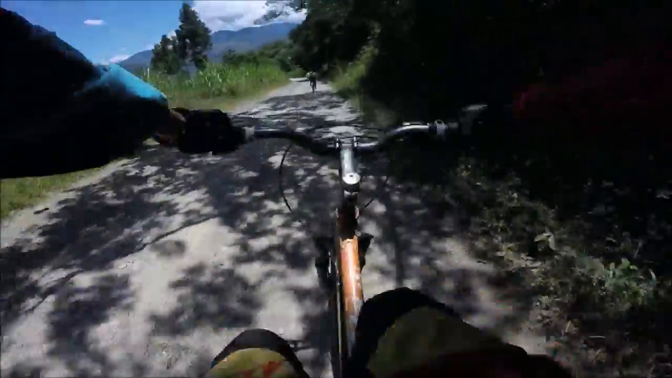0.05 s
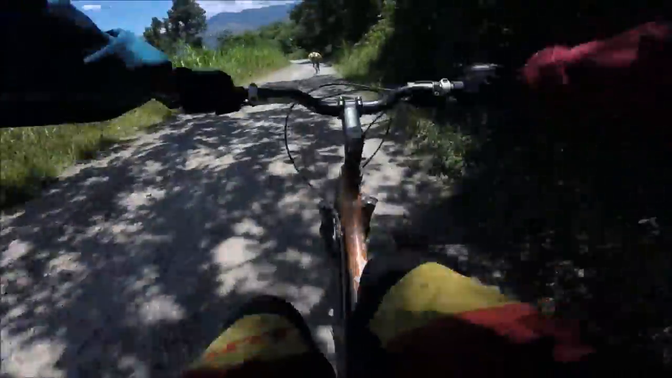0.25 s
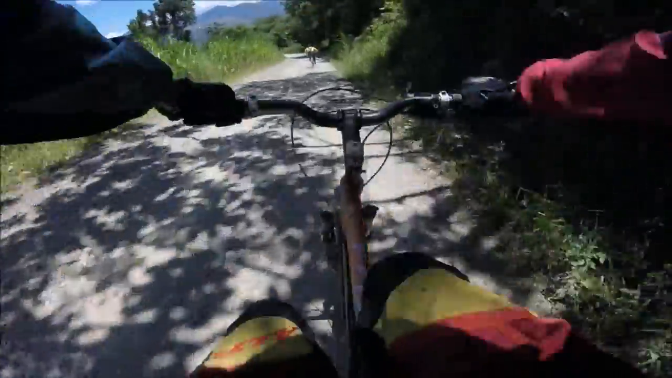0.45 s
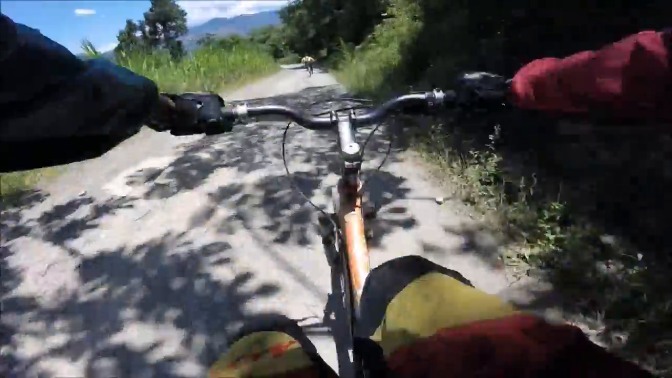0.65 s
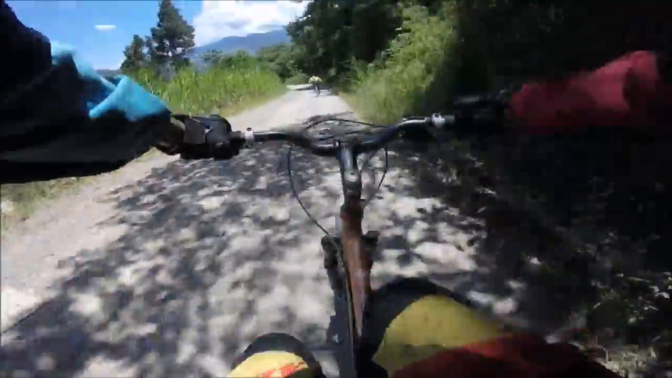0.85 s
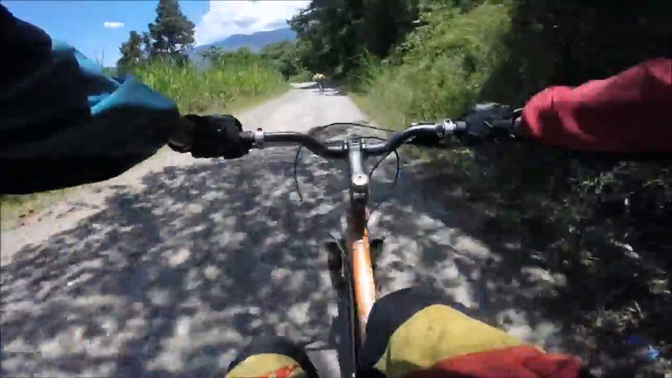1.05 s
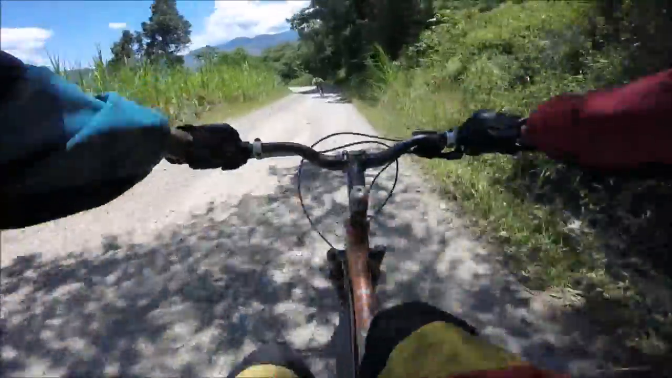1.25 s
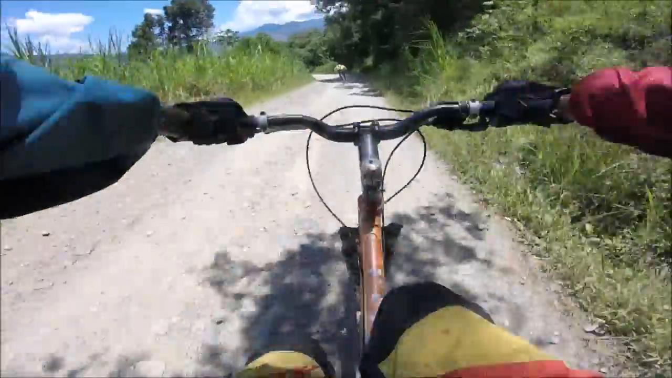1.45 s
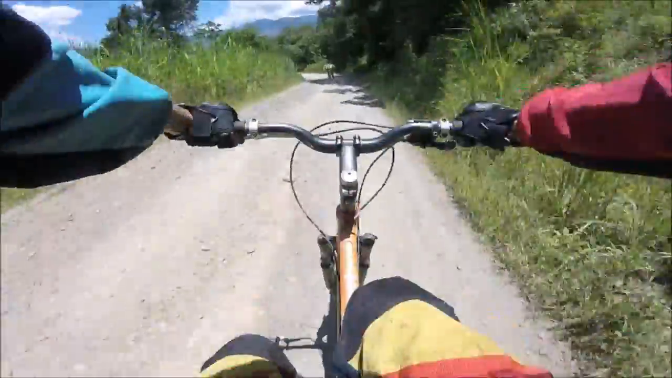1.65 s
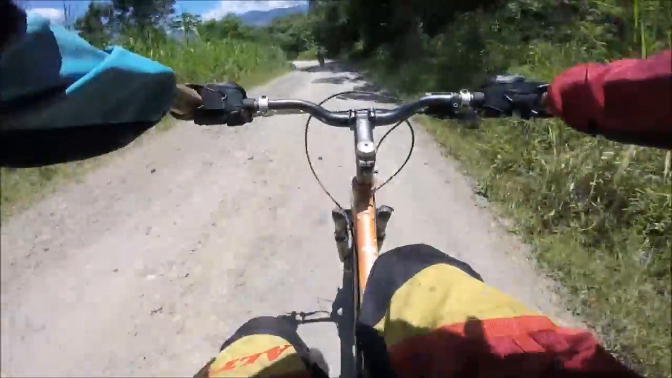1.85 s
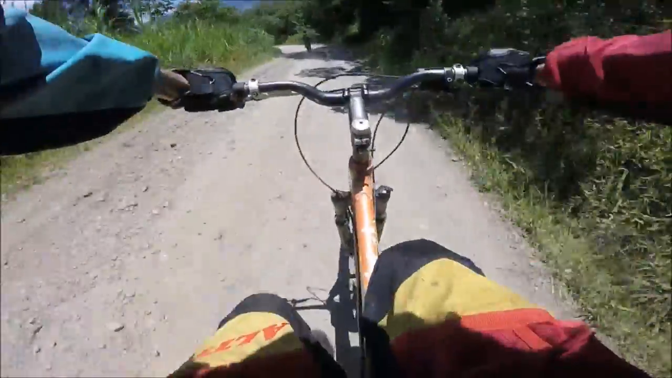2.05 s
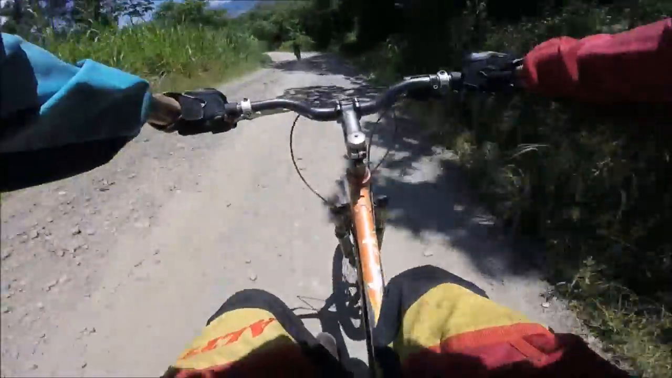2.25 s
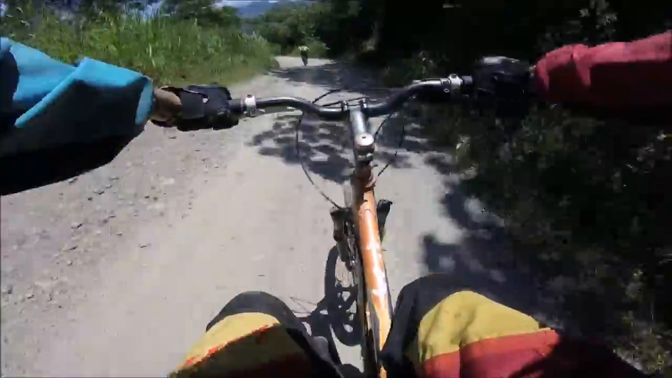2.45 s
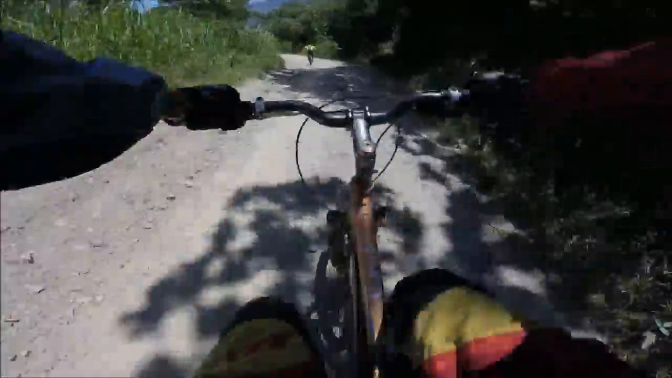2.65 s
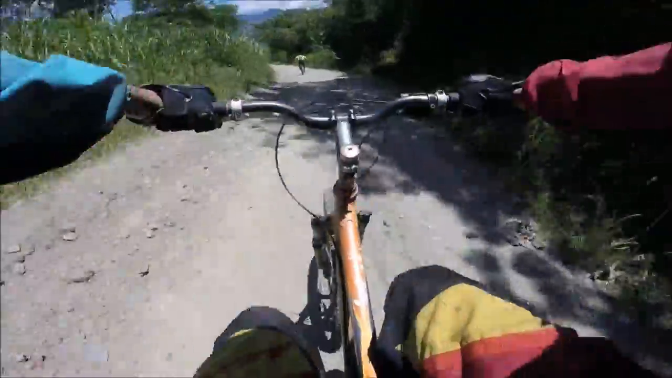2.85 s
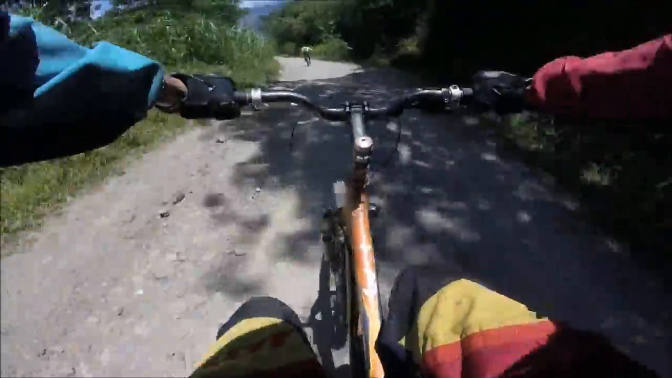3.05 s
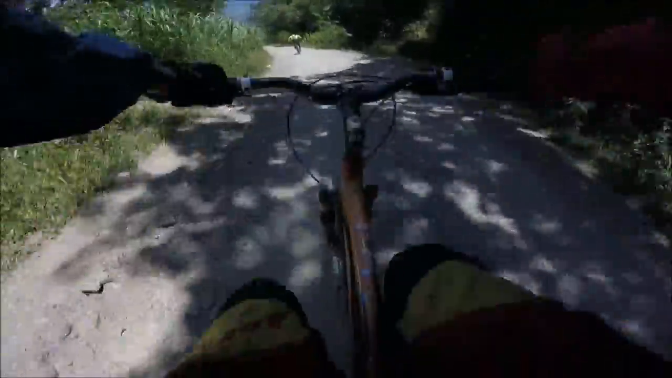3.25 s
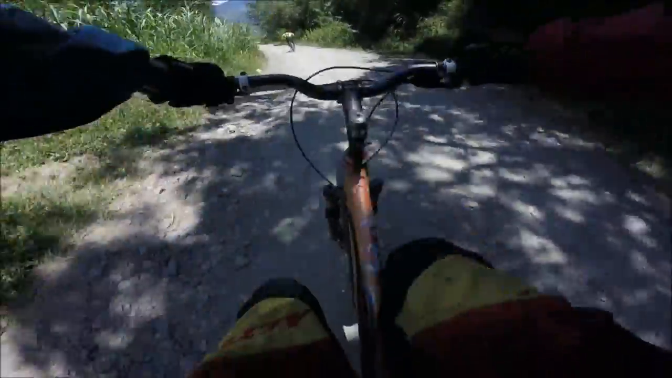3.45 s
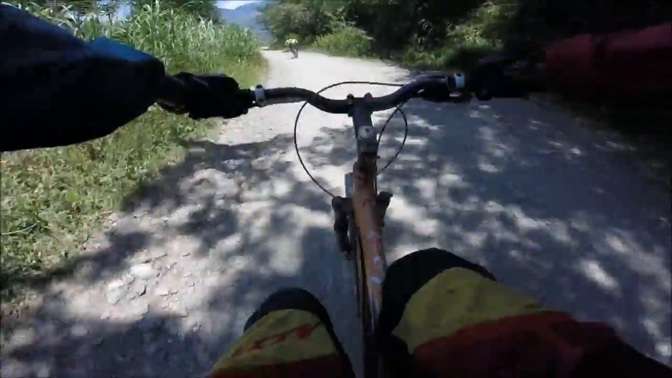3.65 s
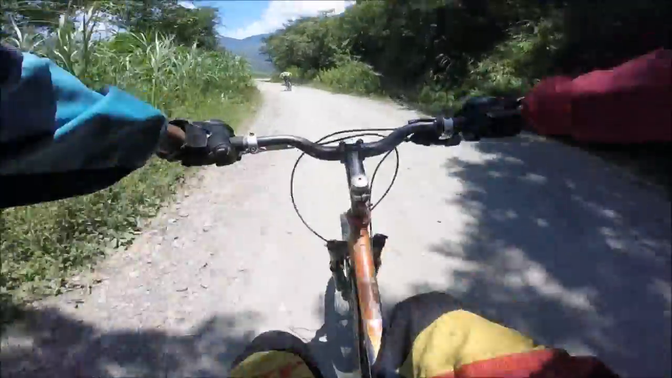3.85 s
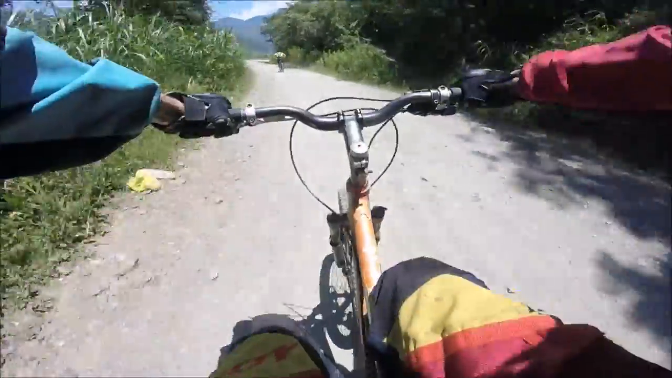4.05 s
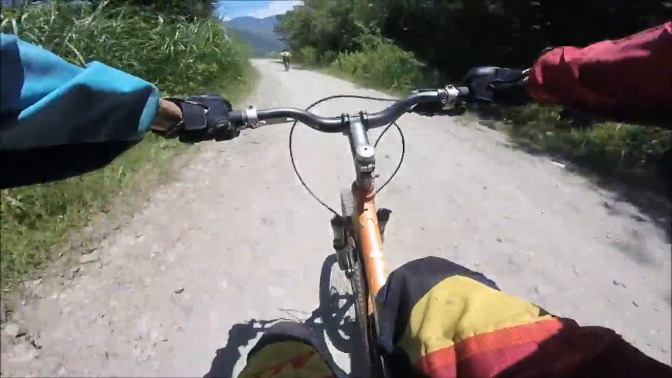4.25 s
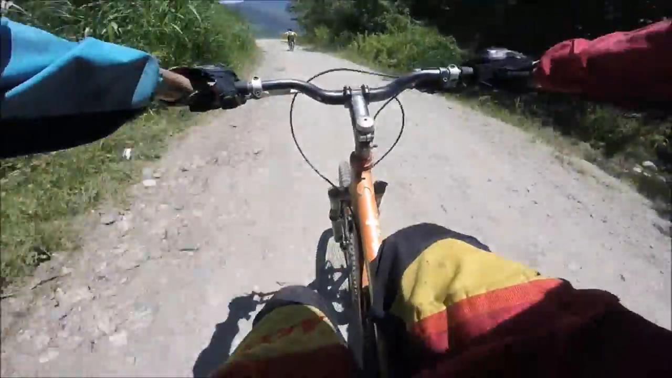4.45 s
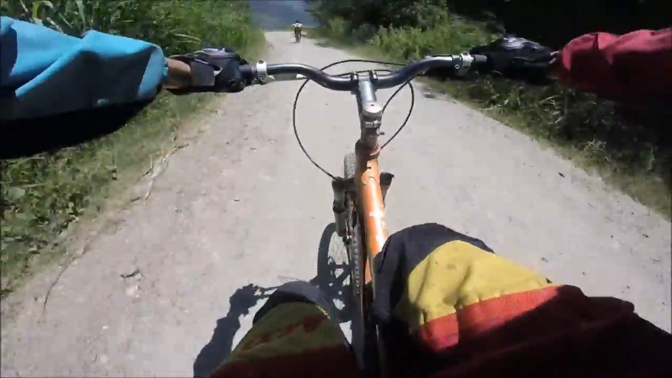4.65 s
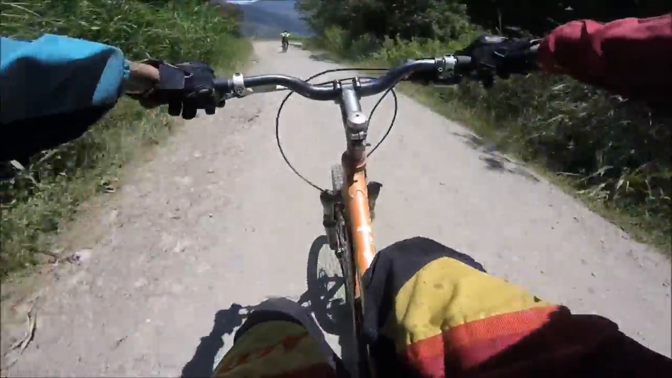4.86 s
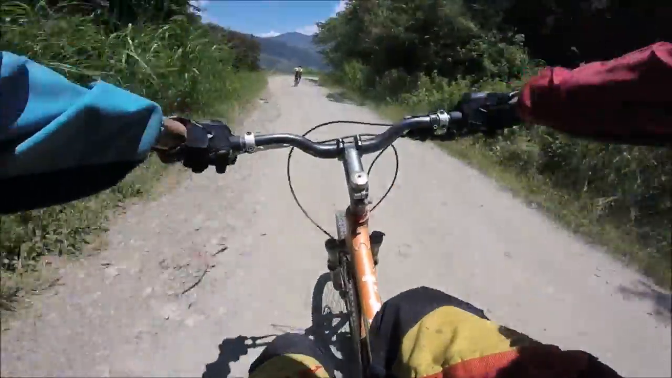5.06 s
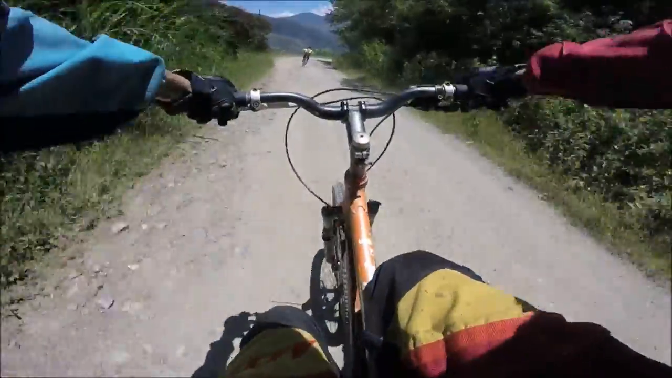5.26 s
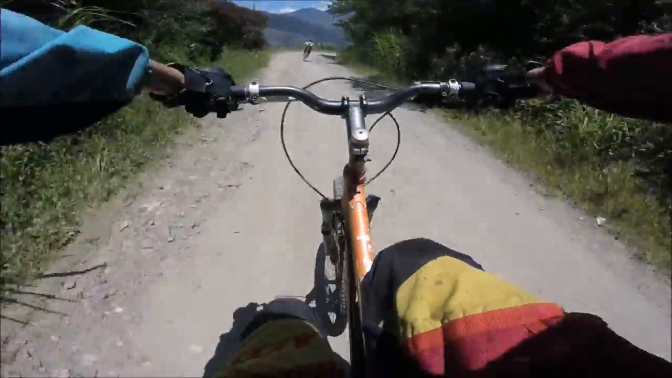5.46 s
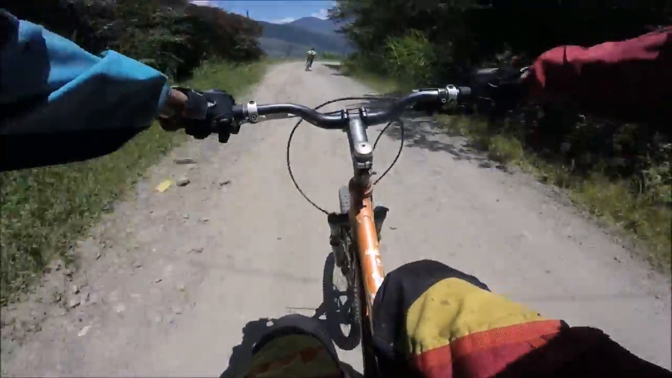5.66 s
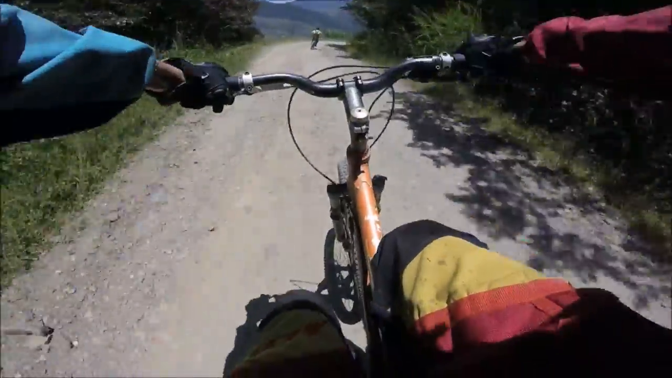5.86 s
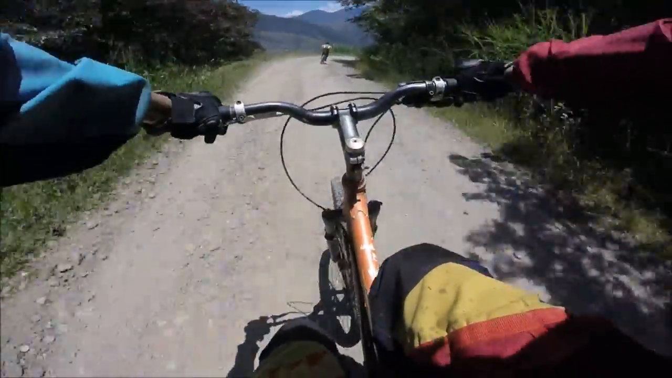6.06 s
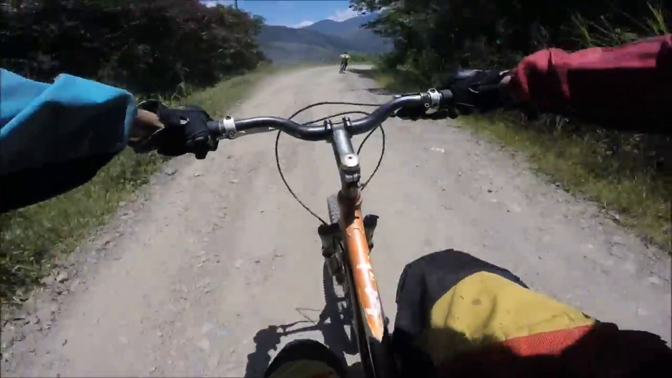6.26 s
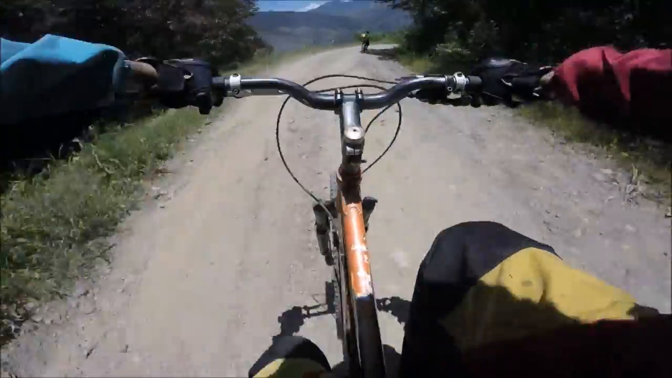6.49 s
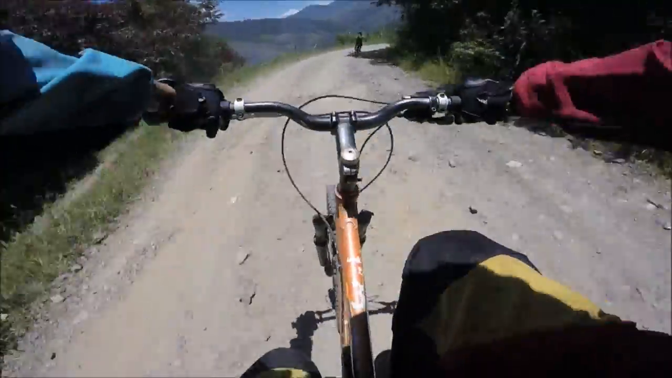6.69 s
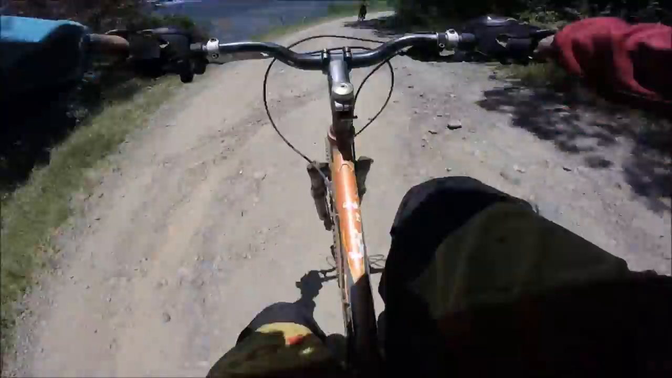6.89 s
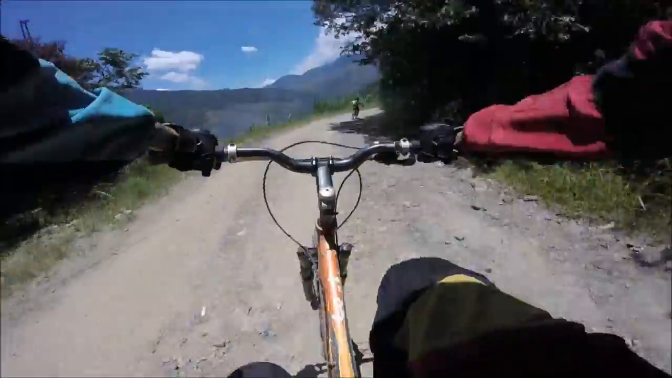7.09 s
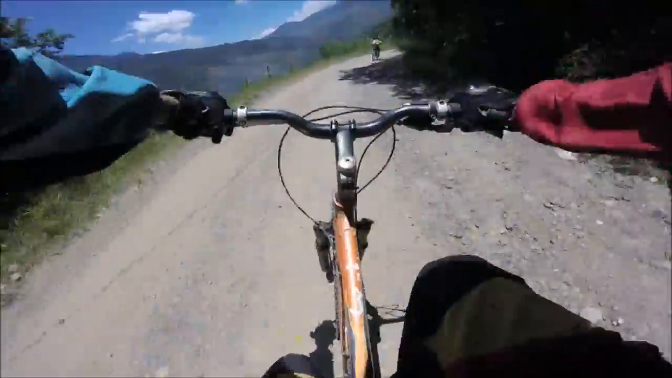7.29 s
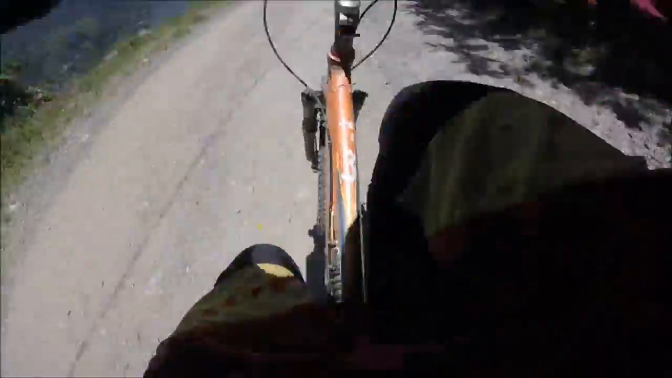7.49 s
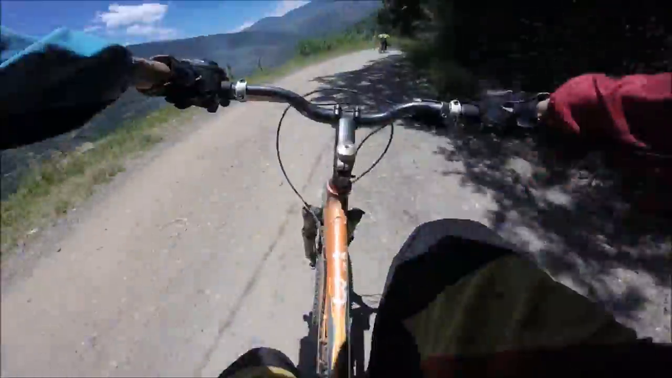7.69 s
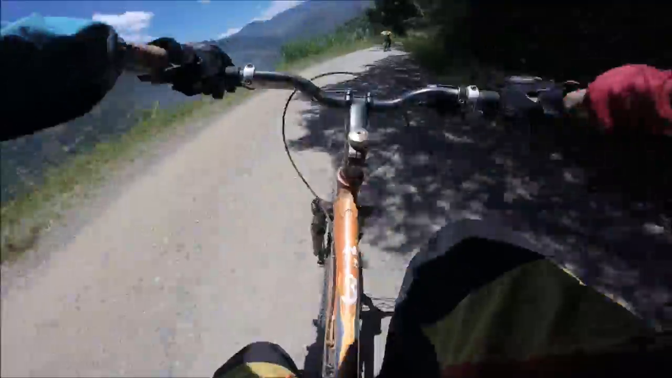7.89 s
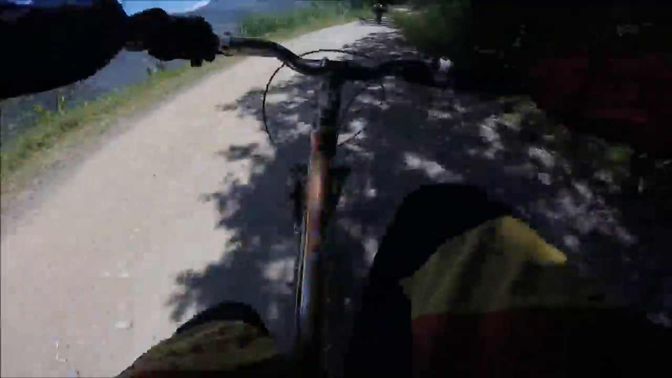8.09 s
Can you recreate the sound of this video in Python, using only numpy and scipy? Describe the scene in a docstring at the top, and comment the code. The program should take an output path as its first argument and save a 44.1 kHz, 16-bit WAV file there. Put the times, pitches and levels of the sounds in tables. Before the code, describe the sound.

Muffled wind and tyre rumble, gritty gravel crunch and a jittery loose-part rattle, broken late by sharp clacks and scrapes against the microphone's case.

```python
"""A gravel road: a bicycle coasts down it fast, heard by a camera in a closed plastic case on the rider's chest.
Filtered noise makes the rumble of wind and tyres; scattered noise grains drive case modes for crunching gravel
and a shivering chain. Bumps press the case in as slow pressure dips, and the hollow case hums in shudders.
Noise bursts through damped modes make chain ticks and the pings of a loose part, and the knocks and scrapes
on the mount, which come mostly near the end."""
import sys
import numpy as np
from scipy import signal
from scipy.io import wavfile
from scipy.ndimage import uniform_filter1d

SR = 44100
rng = np.random.default_rng(int(sys.argv[2]) if len(sys.argv) > 2 else 0)


def master(y):
    """Save y as 16-bit WAV."""
    cut = np.clip(np.atleast_2d(y).T, -1, 1)
    pcm = np.round(cut * 32767)  # scale
    wavfile.write(sys.argv[1], SR, pcm.astype(np.int16))


def linear_from_db(decibels):
    """Turn decibels (scalar or array-like) into linear amplitude factors; 0 gives 1."""
    return 10 ** (np.asarray(decibels, float) / 20)


N = 358533
T = np.arange(N) / SR


def level(x):
    """Scale to rms 1."""
    return x / np.sqrt(np.mean(x ** 2))


def peak(x, db):
    """Scale to a peak level."""
    return x * linear_from_db(db) / np.max(np.abs(x))


def add(out, s, x):
    """Mix x into out from time s."""
    i = int(s * SR)
    out[i:i + len(x)] += x[:N - i]


def soften(x, hz):
    """One-pole low-pass: a softer contact."""
    r = np.exp(-2 * np.pi * hz / SR)
    return signal.lfilter([1 - r], [1, -r], x)


def ring(x, hz, width):
    """One damped mode, gain near 1 at its centre."""
    r = np.exp(-np.pi * width / SR)
    edge = (1 - r * r) / 2
    return signal.lfilter([edge, 0, -edge], [1, -2 * r * np.cos(2 * np.pi * hz / SR), r * r], x)


def body(x, modes):
    """All modes of a body, neighbours in opposite phase."""
    return sum((-1) ** k * linear_from_db(db) * ring(x, hz, width) for k, (hz, width, db) in enumerate(modes))


def struck_at(modes, hz, focus_oct):
    """Mode strengths for a blow at one place: modes far from its ring are weaker."""
    return [(f, w, d - 6 * min(abs(np.log2(f / hz)) / focus_oct, 3.5)) for f, w, d in modes]


def walk(rate):
    """Random levels held 1 / rate s and slewed twice; spread near 1."""
    k = int(SR / rate)
    held = np.repeat(rng.standard_normal(N // k + 1), k)
    return 1.3 * uniform_filter1d(uniform_filter1d(held, k), k)[:N]


def swells(rows, flat):
    """Gain in dB: one swell for every row, bell-shaped or, with a higher flat, flatter on top."""
    return sum(db * np.exp(-np.abs((T - s) / (ms / 2000)) ** flat * np.log(2)) for s, db, ms in rows)


def grains(per_s, spread_db, tail_ms):
    """Scattered contacts, few large and many small, each a short puff of noise."""
    chance = rng.random((3, N))
    size = linear_from_db(spread_db * np.minimum(-np.log(chance[1] + 1e-9), 2.5))
    hits = (chance[0] < per_s / SR) * size
    puffs = signal.lfilter([1], [1, -np.exp(-1000 / (tail_ms * SR))], hits)
    return level(puffs * (chance[2] - .5))


# tilt of the rumble, relative: f/Hz, level per Hz/dB
RUMBLE_TILT = [(15, -30), (25, 0), (35, -18), (54, -14), (156, -21), (195, -18), (389, -54.5), (500, -39),
               (650, -80), (1100, -120)]


def rumble(db, flicker_db=1.1, gust_db=1.5, thump_db=2.0, sway_db=-40):
    """Wind and tyre thrum through the strap: half-octave noise flutters band by band, in gusts and thumps."""
    hz, shape_db = np.transpose(RUMBLE_TILT)
    out = 0
    for f in 45 * 2 ** np.arange(0, 4, .5):
        band = level(ring(ring(rng.standard_normal(N), f, f / 2.28), f, f / 2.28))
        band_db = np.interp(np.log(f), np.log(hz), shape_db) + flicker_db * walk(14)
        out = out + linear_from_db(band_db) * np.sqrt(f) * band  # a wider band holds more power
    sway = level(ring(rng.standard_normal(N), 16.7, 6.7))  # slow, under the rumble
    return linear_from_db(db + gust_db * walk(8) + thump_db * walk(28)) * level(out) + linear_from_db(sway_db) * sway


# case modes: f/Hz, width/Hz, relative level/dB
CASE_MODES = [(500, 730, -24.5), (740, 280, -13), (1030, 110, -12), (1258, 250, -12), (1593, 105, -4.5),
              (2000, 148, -8), (2190, 69, -4), (2560, 91, -2), (2860, 110, -6.5), (3210, 150, -9),
              (3730, 180, -13.5), (4090, 150, -12), (4936, 103, -16)]


def gravel(db, grit_db=-5, patchy_db=1.7, swell_db=1.2, surge_db=1.1):
    """Stones crunch under the tyres over a steady roll; each case mode is fed by its own uneven patch of road."""
    drive = grains(450, 3.0, 3.5) * linear_from_db(surge_db * walk(11))
    drive = drive + linear_from_db(grit_db) * rng.standard_normal(N)
    out = 0
    for k, (hz, width, mode_db) in enumerate(CASE_MODES):
        gain = linear_from_db(mode_db + patchy_db * walk(25) + swell_db * walk(7.6))
        out = out + (-1) ** k * gain * ring(drive, hz, width)
    return linear_from_db(db) * level(soften(soften(out, 3900), 4900))


# level of the chain's shiver before the load of bumps: t/s, level/dB
CHAIN_LEVEL = [(0.0, -70), (0.34, -68), (0.59, -62.5), (1.04, -68), (1.47, -65), (4.89, -66), (5.21, -65),
               (5.86, -69.5), (7.99, -67), (8.13, -59)]
# highest case modes: f/Hz, width/Hz, relative level/dB
CASE_TOP_MODES = [(6100, 820, 18.5), (7290, 210, 18.5), (8240, 530, 19), (9540, 460, 15), (10400, 660, 7),
                  (12200, 800, -43.5), (14000, 1900, -71)]


def chain(load, hiss_db=-3, burst_db=1.8, run_db=0.8, own_db=1.6):
    """The slack chain shivers in tiny contacts that excite the highest case modes, each wavering alone."""
    low_pass = signal.butter(8, 9500, fs=SR, output="sos")
    hiss = signal.sosfilt(low_pass, rng.standard_normal(N))
    contacts = soften(grains(450, 9.3, 2.5), 18000)
    drive = contacts * linear_from_db(burst_db * walk(30) + run_db * walk(7.4)) + linear_from_db(hiss_db) * hiss
    out = 0
    for k, (hz, width, mode_db) in enumerate(CASE_TOP_MODES):
        out = out + (-1) ** k * linear_from_db(mode_db) * ring(linear_from_db(own_db * walk(45)) * drive, hz, width)
    return linear_from_db(np.interp(T, *np.transpose(CHAIN_LEVEL)) + 0.7 * load) * level(out)


# how hard the loose part keeps bouncing, before the load of bumps: t/s, level/dB
BOUNCE_LEVEL = [(0.0, -60.5), (0.74, -62.5), (1.22, -57), (1.47, -53), (1.99, -60), (2.53, -56.5),
                (3.21, -63), (3.42, -63), (3.82, -64), (5.12, -57), (5.41, -62), (6.66, -58.5), (7.0, -62),
                (7.12, -80), (7.8, -71), (7.99, -58.5), (8.13, -54)]


def small_pings(load, per_s=48, uneven=.25, spread_db=1.5, group_db=0.8):
    """Between loud pings the loose part bounces in loose groups, landing on one of two faces of the case."""
    chance = rng.standard_normal((600, 3))
    at = np.cumsum(SR / per_s * np.exp(uneven * chance[:, 0])).astype(int)
    to_loud_s = np.abs(at[:, None] / SR - np.array(LOUD_PINGS)[:, 0]).min(axis=1)
    keep = (at < N) & (to_loud_s > .013)
    size = linear_from_db(spread_db * np.clip(chance[:, 1], -3, 0.8))
    out = 0
    for hz, face in ((2570, chance[:, 2] < .3), (3050, chance[:, 2] >= .3)):
        blows = np.zeros(N)
        blows[at[keep & face]] = size[keep & face]
        puffs = soften(blows, 110) * rng.standard_normal(N)
        out = out + body(ring(puffs, hz, 1200), struck_at(CASE_MODES, hz, 0.17))
    db = np.interp(T, *np.transpose(BOUNCE_LEVEL)) - 0.75 * load
    return linear_from_db(db + group_db * walk(4.7)) * level(out)


def small_jolts(per_s=6.7, uneven=0.38, depth_db=-25, spread_db=3.5, width_ms=21, clear_s=.06):
    """Rows of the lesser bumps that come by chance between the big ones."""
    chance = rng.standard_normal((200, 3))
    at = np.cumsum(np.exp(uneven * chance[:, 0]) / per_s)
    free = np.abs(at[:, None] - np.array(BIG_JOLTS)[:, 0]).min(axis=1) > clear_s
    rows = np.c_[at, depth_db + spread_db * chance[:, 1], width_ms * np.exp(.3 * chance[:, 2])]
    return list(rows[free & (at < N / SR)])


# big bumps that push the case in: t/s, level of the dip without its rebound/dB, width at half depth/ms
BIG_JOLTS = [(0.026, -16.5, 21), (0.364, -17, 15), (0.423, -16, 16), (0.52, -21.5, 37), (0.698, -22.5, 21),
             (1.01, -17.5, 21), (1.414, -18, 24.5), (1.511, -18, 16), (1.606, -22, 20), (1.74, -18.5, 28),
             (1.932, -21.5, 24), (2.073, -15.5, 18), (2.28, -21, 27), (2.365, -19.5, 14), (2.713, -18, 16),
             (2.948, -22.5, 14), (3.088, -19.5, 23), (3.248, -22, 15), (3.431, -25, 24), (3.528, -20, 19),
             (3.588, -19.5, 15.6), (3.784, -21.5, 34), (3.879, -16, 22.5), (4.125, -21, 31),
             (4.245, -23, 19), (4.318, -19.5, 19), (4.386, -17.5, 7.8), (4.59, -15.5, 20), (5.05, -16, 20),
             (5.115, -17, 17.5), (5.369, -20.5, 35), (5.435, -14.5, 19), (5.512, -21.5, 14),
             (5.673, -18, 14), (6.101, -21.5, 11), (6.187, -21.5, 17), (6.251, -20, 15), (6.338, -17.5, 21),
             (7.174, -10.5, 4.5), (7.514, -21, 25), (7.68, -14.5, 4.6), (8.074, -17, 24)]


def jolts(rebound=2.87):
    """A dip in pressure, and the strap's rebound, wider by that factor, that cancels it on average."""
    out = 0
    for s, db, ms in list(BIG_JOLTS) + small_jolts():
        u = (T - s) / (ms / 2355)  # time in standard deviations of the dip
        dip = np.exp(-u ** 2 / 2)
        recoil = np.exp(-u ** 2 / 2 / rebound ** 2) / rebound
        out = out + linear_from_db(db) * (recoil - dip)
    return out


# the strap shudders, so the rumble swells: t at the top/s, added level/dB, length at half that gain/ms
STRAP_SHUDDERS = [(0.25, 9.5, 45), (0.335, 5.5, 41), (0.41, 3.5, 42), (0.515, 3.5, 52), (0.925, 5.5, 60),
                  (6.61, 3.5, 85), (7.135, 16.5, 28), (7.17, 16.5, 29), (7.225, 10, 56), (7.518, 13, 20),
                  (7.655, 8.5, 77), (7.7, 0.5, 31)]


def shudder_db():
    """Gain of the rumble while the strap shudders."""
    return swells(STRAP_SHUDDERS, 1.9)


def thrum(hum_hz=179, db=-42, waver=0.1, flutter_db=3.0):
    """The lowest mode of the hollow case, a wavering hum shaken only during a shudder."""
    phase = 2 * np.pi * np.cumsum(hum_hz * (1 + waver * walk(25))) / SR
    hum = np.sin(phase) * linear_from_db(flutter_db * walk(40))
    return linear_from_db(db) * (linear_from_db(shudder_db()) - 1) * level(hum)


def taps(events, modes, focus_oct, contact_ms, reach, rebound_ms, rebound_db):
    """Short taps, each a bright crack and a ring, with one weaker rebound; modes near the place ring most."""
    crack_db, crack_ms, crack_up = -8, 0.26, 1.22  # crack_up: crack pitch over ring pitch
    out, t = np.zeros(N), T[:SR // 20]
    chance = rng.standard_normal((len(events), 2, len(t)))
    for (s, db, hz), pair in zip(events, chance):
        crack_hz = crack_up * hz
        for noise, late_ms, less_db in zip(pair, (0, rebound_ms), (0, rebound_db)):
            contact = (1 - np.exp(-t * 4000)) * noise * np.exp(-t * 1000 / contact_ms)
            blow = ring(contact, hz, reach * hz)
            snap = noise * np.exp(-t * 1000 / crack_ms)
            crack = ring(ring(snap, crack_hz, 0.2 * hz), crack_hz, 0.2 * hz)
            tap = peak(body(blow, struck_at(modes, hz, focus_oct)), 0) + peak(crack, crack_db)
            add(out, s + late_ms / 1000, linear_from_db(db + less_db) * tap)
    return out


# loud chain ticks: t/s, peak level of the ring without its crack/dB, strongest ring f/Hz
LOUD_TICKS = [(0.3855, -46.5, 6860), (0.563, -46, 8300), (0.7866, -50, 8170), (1.225, -49, 8060),
              (2.576, -51, 8360), (2.6319, -42, 8240), (3.8821, -44, 8200), (4.072, -46.5, 8400),
              (4.4727, -47.5, 9400), (4.594, -49, 9400), (4.92, -51, 9050), (4.99, -49, 8300),
              (5.115, -47, 6200), (5.25, -50, 7100), (5.8721, -48, 6030), (6.2412, -49, 8240),
              (6.4951, -48, 6120), (6.8638, -43.5, 6440), (6.9225, -46.5, 6120)]


def ticks():
    """Single chain contacts ring the highest case modes."""
    return taps(LOUD_TICKS, CASE_TOP_MODES, focus_oct=0.36, contact_ms=5.1, reach=0.76,
                rebound_ms=12, rebound_db=-15)


# scrapes over the mount: t/s, length/ms, rms level of the body/dB, treble level over the body/dB, strongest ring f/Hz
SCRAPE_STROKES = [(0.396, 9.6, -57, -12, 2400), (7.113, 73, -45.5, -19, 2150), (7.176, 17, -42, -24, 2200),
                  (7.21, 12, -41.5, 1, 2550), (7.228, 39, -49.5, -31, 2150), (7.445, 22, -50, -33, 2150),
                  (7.515, 51, -43.5, -4, 2200), (7.538, 34, -44, -27, 2550), (7.629, 72, -42.5, -19, 2100),
                  (7.683, 12, -42, -13, 2700), (7.694, 12, -37.5, -22, 2880), (7.712, 16.6, -43, -7, 2850)]
# modes of the chest mount: f/Hz, width/Hz, relative level/dB
MOUNT_MODES = [(640, 120, 4), (970, 540, -5), (1010, 150, 0), (1480, 180, 10), (1750, 185, 7.5),
               (1880, 193, 9), (2190, 240, 5.5), (2550, 236, 7.5), (2870, 296, 2), (3480, 190, -7.5)]
# highest modes of the mount: f/Hz, width/Hz, relative level/dB
MOUNT_TOP_MODES = [(3930, 220, 11), (4240, 180, 12), (5190, 220, 3.5), (6020, 210, 4.5), (7590, 860, 1.5),
                   (8170, 420, 4), (10600, 620, -15), (11700, 310, -12), (13700, 900, -23)]


def scrapes(focus_oct=0.59):
    """Cloth and buckle drag and clatter over the mount: gritty noise that swells and stops."""
    out, grit = np.zeros(N), grains(2400, 3.5, 1.0)
    for s, ms, db, rel_db, hz in SCRAPE_STROKES:
        rub = grit[int(s * SR):][:int(ms * SR / 1000)]
        rub = np.pad(level(rub) * np.hanning(len(rub)) ** 0.38, (0, 900))  # room to ring out
        top = soften(soften(rub, 6500), 6500) if rel_db < -3 else rub  # cloth is dull, the buckle bright
        low_ring = level(body(rub, struck_at(MOUNT_MODES, hz, focus_oct)))
        top_ring = linear_from_db(rel_db) * level(body(top, MOUNT_TOP_MODES))
        add(out, s, linear_from_db(db) * (low_ring + top_ring))
    return out


# knocks on the mount: t/s, peak level of the body/dB, strongest ring f/Hz, treble level over the body/dB, #
# thud peak level/dB, spread of the ring/octaves, contact/ms
MOUNT_KNOCKS = [(0.402, -30, 2480, -18, -36, 0.37, 8.7), (3.236, -46, 1500, -40, -55, .3, 4.9),
                (3.34, -34.5, 1530, -20, -44, .3, 5.6), (5.678, -29, 685, -35, -28, 0.79, 4.4),
                (5.686, -36, 640, -40, -38, 0.35, 6), (7.0541, -25, 2240, -34, -26.5, 0.21, 8.5),
                (7.0538, -27.5, 1010, -45, -27, 0.14, 8.4), (7.1697, -7, 2450, -8, -19.5, 0.6, 4.8),
                (7.474, -17, 2160, -34, -15, 0.19, 7.4), (7.512, -16, 2500, -12.5, -16, 0.32, 3.3),
                (7.678, -8.5, 2700, -6.5, -19, 0.97, 2.6), (7.767, -43, 2150, -10, -42, .6, 5.7),
                (7.885, -31, 2940, -7, -57, 0.23, 3)]
# modes of the hollow case: f/Hz, width/Hz, relative level/dB
THUD_MODES = [(188, 197, 8), (365, 220, 9), (620, 720, 4.5), (950, 120, -17.5), (990, 110, 8),
              (1266, 140, 10)]


def knocks(rattle_db=-28, rise_ms=0.25, strike=2.03, thud_ms=0.99, dull_cut=0.85, chirp=0.61,
           crack_ms=1.7, crack_db=-4):
    """A burst of contact noise rings the mount, a firm push the hollow of the case."""
    out, t = np.zeros(N), T[:SR // 6] * 1000  # t in ms
    for s, db, hz, rel_db, thud_db, focus, ms in MOUNT_KNOCKS:
        hard = np.interp(rel_db, [-28, -13], [0, 1])  # the brighter, the harder
        # a dull blow presses on, chirping, then stops dead; a hard one dies away and rattles after
        contact = np.exp(-(t / max(ms, .5)) ** (4 - 3 * hard)) + hard * linear_from_db(rattle_db) * np.exp(-t / 30)
        slip = (1 - hard) * chirp * np.sin(2 * np.pi * hz * t / 1000)
        blow = (rng.standard_normal(len(t)) + slip) * (1 - np.exp(-t / rise_ms)) * contact
        blow[int(rise_ms * SR / 1000)] -= strike * (1 + 2 * hard)  # the first touch is one sharp strike
        snap = soften(blow * np.exp(-t / crack_ms), hz)
        crack = ring(ring(snap, 1.03 * hz, 1.16 * hz), 1.03 * hz, 1.16 * hz)
        held = 1
        if hard < .5:
            for _ in range(3):
                blow = soften(blow, dull_cut * hz)
            held = np.exp(-(t / (1.1 * ms)) ** 6)  # the pressing hand of the blow stops the ring
        low_clack = peak(held * body(blow, struck_at(MOUNT_MODES, hz, focus)), db)
        top_clack = peak(body(soften(blow, 9000), MOUNT_TOP_MODES), db + rel_db)
        push = t / thud_ms * np.exp(-t / thud_ms) + 0.37 * blow
        thud = peak(body(push, THUD_MODES), thud_db)
        add(out, s, low_clack + top_clack + peak(crack, db + crack_db) - thud)
    return out


# larger stones crushed under a tyre: t at the top/s, added level/dB, length at half that gain/ms
STONE_CRUNCHES = [(0.5, 13.5, 54), (1.35, 15, 52), (1.73, 1, 41), (3.47, 9, 33), (3.875, 13.5, 46),
                  (4.59, 7.5, 70), (5.045, 6, 33), (5.11, 7, 63), (5.67, 7, 37), (6.33, 7, 28)]


def crunch(load, db=-62, db_per_load=2.6, ring_hz=2120):
    """Crushed stones ring the middle modes of the case."""
    gain = linear_from_db(db + db_per_load * load + swells(STONE_CRUNCHES, 2.0))
    return gain * level(body(grains(700, 9.3, 4.4), struck_at(CASE_MODES, ring_hz, 0.12)))


# loud pings of a loose part: t/s, peak level of the ring without its crack/dB, strongest ring f/Hz
LOUD_PINGS = [(1.0212, -40, 2600), (1.3447, -34, 2230), (1.657, -38, 2550), (1.7394, -33.5, 2120),
              (2.192, -33.5, 2550), (2.3882, -37.5, 2560), (2.6784, -34.5, 2550), (2.923, -33, 2550),
              (2.9654, -37, 2560), (3.254, -38, 2550), (3.343, -36.5, 2560), (3.365, -37, 2560),
              (3.393, -38, 2700), (3.423, -37, 2560), (3.5, -35.5, 2620), (3.525, -40, 2600),
              (3.573, -35.5, 2700), (3.591, -40, 2560), (3.2952, -37, 2560), (2.337, -40, 2560),
              (2.355, -39, 2600), (2.372, -37, 2560), (2.41, -40, 2560), (2.506, -47, 2750),
              (2.5476, -43, 2560), (2.5767, -39.5, 2830), (2.814, -38, 2560), (0.607, -40, 2560),
              (0.815, -38, 2560), (1.4506, -39, 2560), (1.5775, -39, 2560), (3.007, -40.5, 2560),
              (3.029, -40, 2600), (3.192, -41, 2570), (3.228, -43, 2560), (3.55, -40, 2520),
              (4.221, -39.5, 2560), (4.35, -44, 2880), (4.475, -40.5, 2900), (4.664, -40, 2560),
              (4.752, -44, 2930), (4.1195, -38, 2560), (4.38, -38, 2560), (4.427, -38, 2560),
              (4.7972, -43, 2560), (4.9465, -40, 2560), (4.988, -38, 2620), (6.36, -47, 2560),
              (6.707, -38, 2560), (6.928, -39, 2560), (3.442, -33, 2590), (3.649, -35.5, 2670),
              (4.0252, -35, 2560), (4.2973, -37, 2550), (4.853, -34, 2610), (4.8954, -35.5, 2570),
              (5.137, -36, 2190), (5.237, -36, 2570), (5.28, -35.5, 2640), (5.338, -37.5, 2700),
              (5.4145, -37, 2030), (5.5087, -38, 2550), (6.111, -39, 2560), (6.154, -32.5, 2550),
              (6.2434, -35.5, 2560), (6.311, -37.5, 2560), (6.739, -34.5, 2600), (6.81, -34.5, 2620),
              (7.3585, -33, 2860), (7.414, -36, 2060), (7.933, -32.5, 2700), (7.9814, -32.5, 2670),
              (8.0345, -30, 2770)]


def pings():
    """A loose part strikes the case and rings the modes near the place struck."""
    return taps(LOUD_PINGS, CASE_MODES, focus_oct=0.13, contact_ms=2.34, reach=1.0,
                rebound_ms=16, rebound_db=-10.5)


# the road, loud where rough and quiet where smooth, before swells and bumps:
# t/s, rumble level/dB, gravel level/dB
ROAD_LEVELS = [(0.0, -37.5, -47), (0.17, -50, -56), (0.36, -41.5, -51), (0.74, -45.5, -50.5),
               (0.95, -44.5, -55), (1.25, -48, -55.5), (1.72, -40, -49), (2.05, -46, -55), (2.85, -43, -52),
               (3.28, -47.5, -56), (3.56, -42, -51), (3.72, -47, -54), (3.89, -41, -50.5),
               (4.1, -48.5, -55), (4.7, -42.5, -54), (5.14, -42.5, -51), (5.3, -45.5, -52.5),
               (6.16, -42, -54.5), (6.36, -44.5, -50), (6.46, -46, -56), (6.9, -39, -52), (7.31, -41, -48),
               (7.72, -37, -51.5), (8.13, -54, -52)]


def scene(rumble_db_per_load=1.0, gravel_db_per_load=0.04):
    """All sources at the one microphone; a bump loads the tyres, so rumble and crunch swell with it."""
    s, *columns = np.transpose(ROAD_LEVELS)
    rumble_db, gravel_db = (np.interp(T, s, c) for c in columns)
    bumps = jolts()
    load = uniform_filter1d(np.abs(bumps), size=2200)
    load = load / load.mean() - 1  # 0 on average
    rolling = rumble(rumble_db + shudder_db() + rumble_db_per_load * load)
    rolling = rolling + gravel(gravel_db + gravel_db_per_load * load)
    rattle = chain(load) + small_pings(load) + ticks() + pings()
    mix = rolling + rattle + bumps + thrum() + scrapes() + knocks() + crunch(load)
    return mix[None]


def band_limit(x):
    """A steep low-pass at the top of the band."""
    return signal.sosfilt(signal.butter(12, 15460, fs=SR, output="sos"), x)


def record(dry):
    """A steep low-pass cuts the top above 15150 Hz."""
    low_pass = signal.ellip(8, .2, 70, 15150, fs=SR, output="sos")
    mix = signal.sosfilt(low_pass, dry)
    return band_limit(mix)


dry = scene()
out = record(dry)
master(out)
```